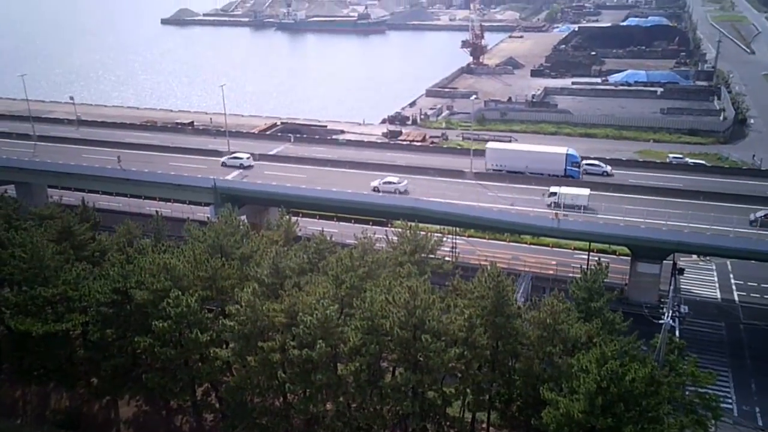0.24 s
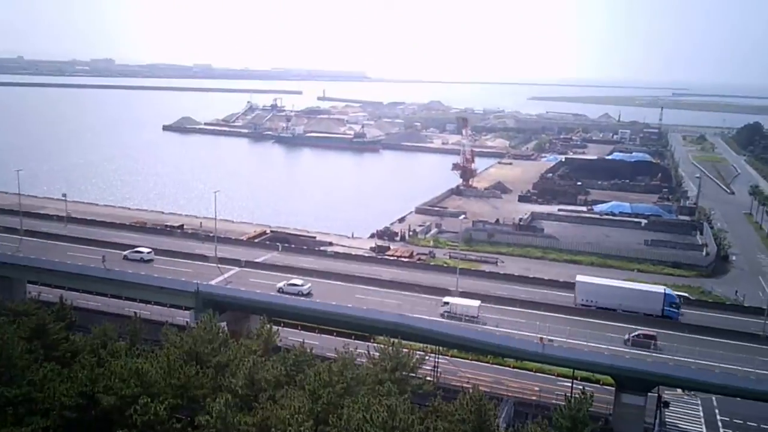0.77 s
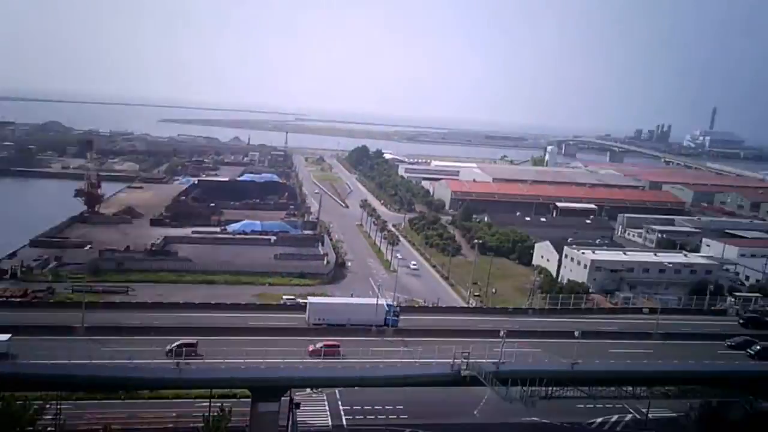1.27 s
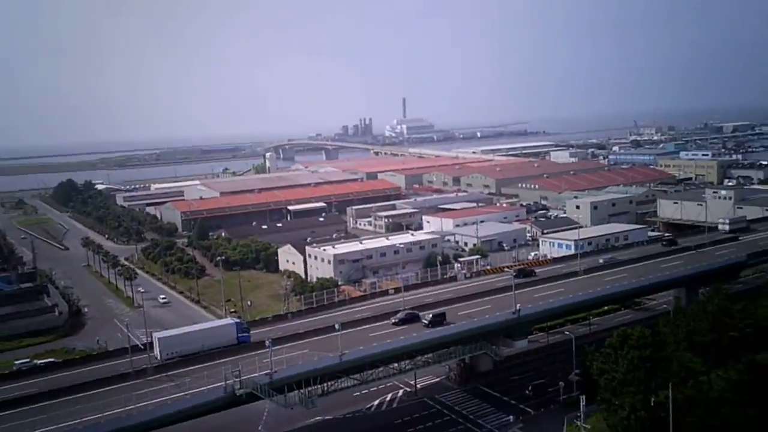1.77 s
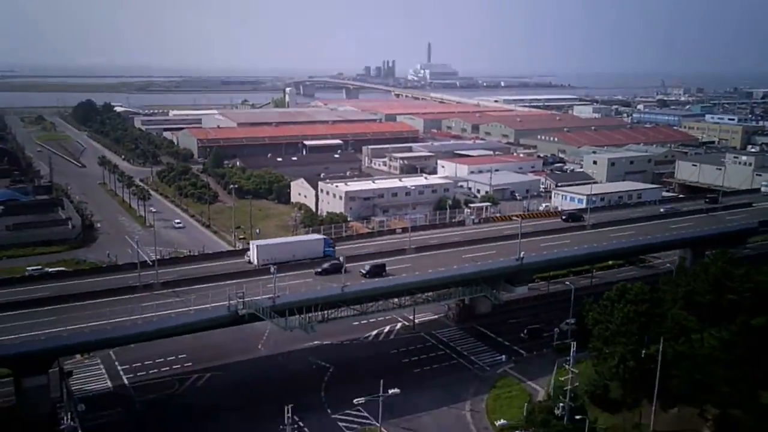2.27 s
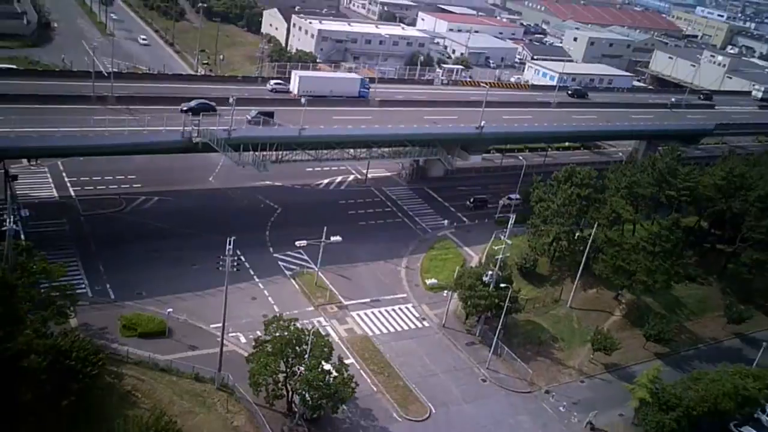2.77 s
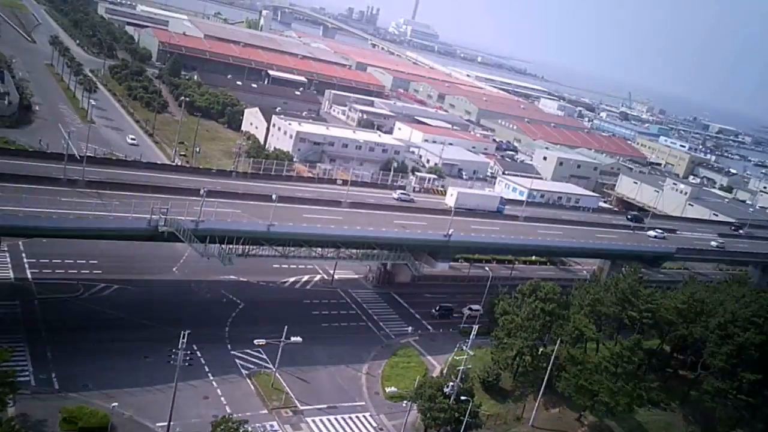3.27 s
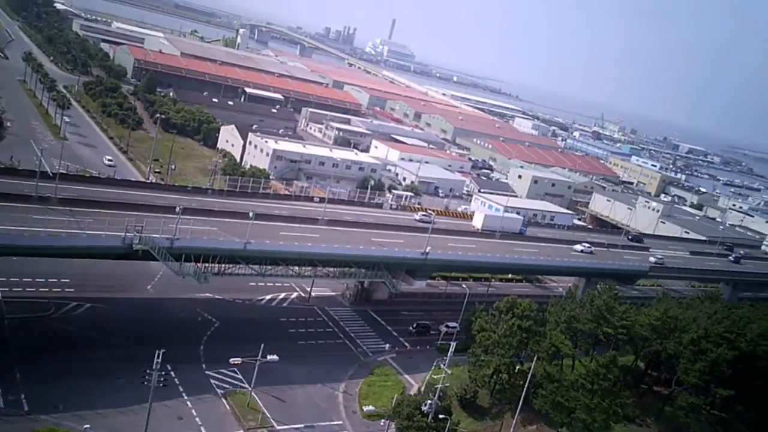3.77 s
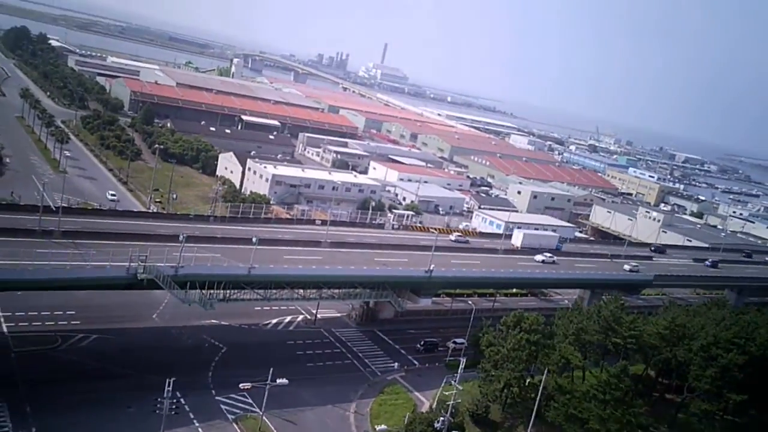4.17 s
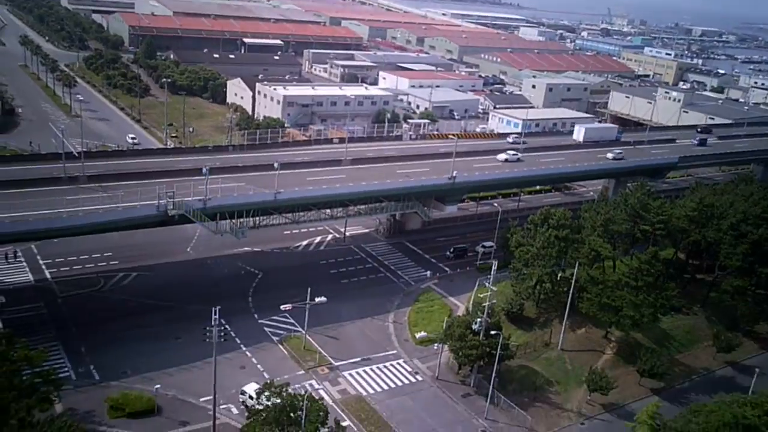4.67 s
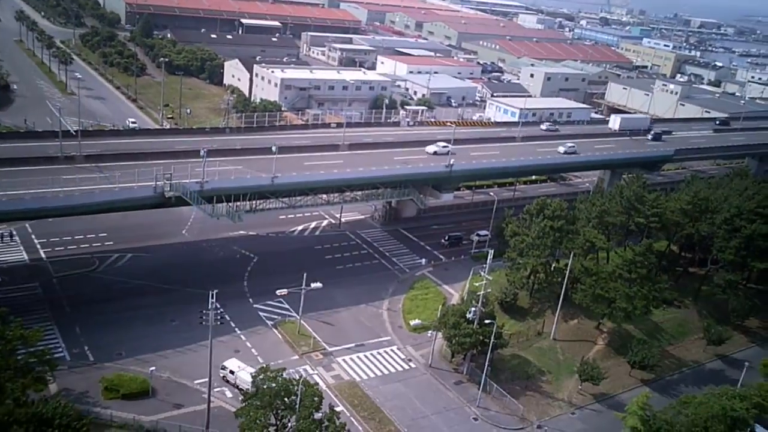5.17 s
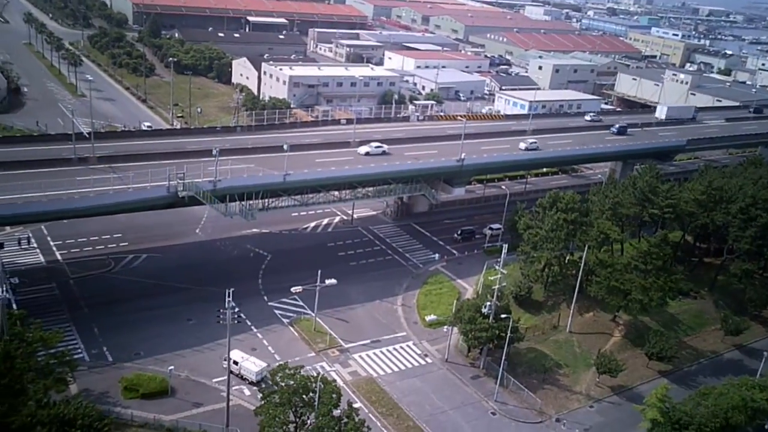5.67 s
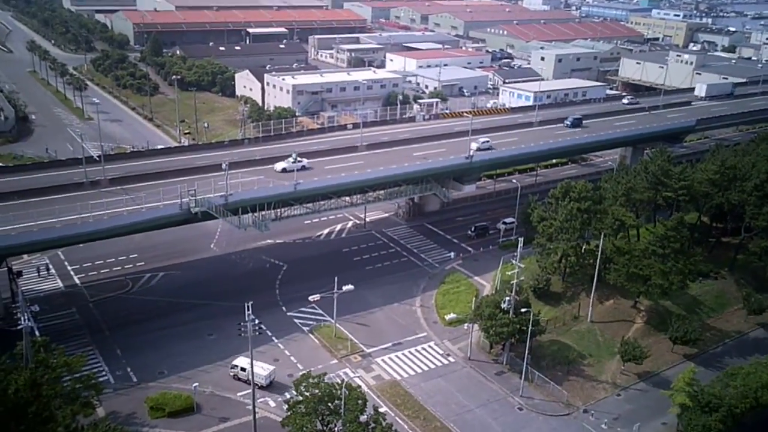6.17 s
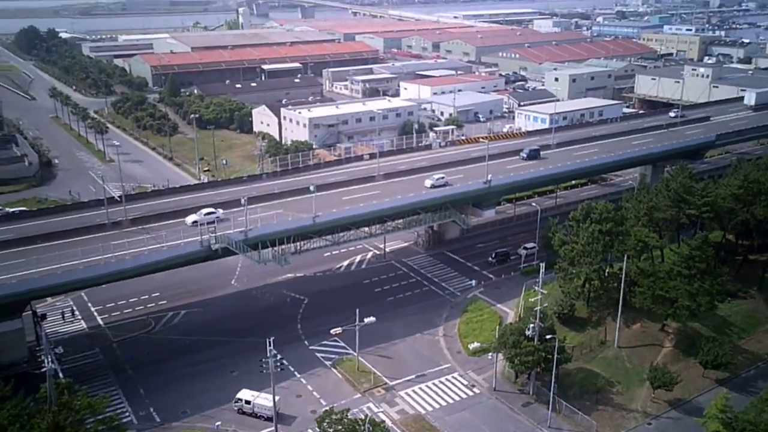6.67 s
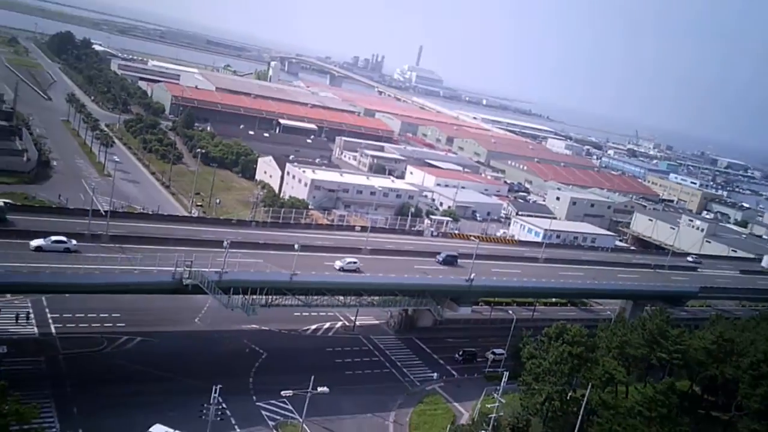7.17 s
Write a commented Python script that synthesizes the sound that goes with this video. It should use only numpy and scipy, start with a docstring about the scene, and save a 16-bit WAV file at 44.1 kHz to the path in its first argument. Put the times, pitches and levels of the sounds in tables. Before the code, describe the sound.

A small flying drone carries its own cheap microphone, very close to the motors. A low buzzing drone, gritty propeller wash and several unsteady shrill gear whines run continuously. After a quieter opening the sound bursts into overloaded, crackly roaring, then falls by stages to a loud, churning hum. Narrow dull bandwidth, no quiet gaps, short pitch yips throughout.

```python
"""Toy quadcopter in flight

A toy quadcopter flies, heard from the tiny camera that it carries. Four geared propellers hum through
the plastic frame (harmonics of the blade rate) and whine at their gear teeth; their speeds glide and yip.
Shaped noise makes the rush of air, the churning and the wind; a resonator makes the frame ring.
The whole sound suddenly leaps up to an overloaded roar, then falls back in steps."""
import sys
import numpy as np
from scipy import signal
from scipy.fft import rfft, irfft, next_fast_len
from scipy.io import wavfile
from scipy.ndimage import uniform_filter1d

SR = 44100
rng = np.random.default_rng(int(sys.argv[2]) if len(sys.argv) > 2 else 0)


def file_out(sig):
    """Save sig as 16-bit WAV at sys.argv[1]."""
    # one column per channel
    cols = np.atleast_2d(sig).T
    # limit, then scale
    lim = np.clip(cols, -1, 1)
    pcm = np.round(lim * 32767).astype(np.int16)
    wavfile.write(sys.argv[1], SR, pcm)


N = 327663
TIME = np.arange(N) / SR  # [s]
FUNDAMENTAL_LOSS = 0.67   # dB that the fundamental loses for each dB that the overtones gain


def from_db(db):
    """Decibels as an amplitude ratio: 20 dB for each factor of ten."""
    return 10 ** (np.asarray(db) / 20)


def rms_one(x):
    """Normalise the signal power, so that the rms is 1."""
    return x / np.sqrt(np.mean(x ** 2) + 1e-20)


def in_time(rows):
    """Linear interpolation of each column of a curve at every sample."""
    times, *columns = np.transpose(rows)
    return [np.interp(TIME, times, column) for column in columns]


def at_hz(points, hz):
    """Spectrum read by linear interpolation of decibels over log frequency."""
    f, level = np.transpose(points)
    return np.interp(np.log(np.maximum(hz, 1)), np.log(f), level)


def drift(corner_hz):
    """Slow random fluctuation of rms 1: white noise through a double-pole low-pass."""
    step = 40  # samples between the computed values
    r = np.exp(-2 * np.pi * corner_hz * step / SR)
    noise = rng.standard_normal(N // step + 2002)
    slow = signal.lfilter([1], [1, -2 * r, r * r], noise)[2000:]  # without the onset of the filter
    return np.interp(np.arange(N) / step, np.arange(len(slow)), rms_one(slow))


def coloured(x, spectrum):
    """Spectral shaping by a gain at each frequency, within the band of the small microphone; rms 1."""
    size = next_fast_len(N)
    hz = np.arange(size // 2 + 1) * SR / size
    gain = from_db(at_hz(spectrum, hz)) * (hz < SR / 8)
    return rms_one(irfft(rfft(x, size) * gain, size)[:N])


def wind_buffeting():
    """Wind on the microphone: random pressure with its power at low frequencies; rms 1."""
    # relative spectrum of the buffeting: (frequency [Hz], density [dB per Hz])
    buffet_spectrum = [(8, -5), (20, -14), (35, -1), (75, 3), (120, -3), (250, -3), (600, -20), (5500, -61)]
    return coloured(rng.standard_normal(N), buffet_spectrum)


def churning_air():
    """Low churning of disturbed air: random pressure as low-frequency noise; rms 1."""
    # relative spectrum of the churning: (frequency [Hz], density [dB per Hz])
    churn_spectrum = [(60, -28.5), (132, 1.5), (160, -7.5), (200, -9.5), (270, 2.5), (430, -0.5),
                      (520, -4.5), (640, -16.5), (2000, -42.5)]
    return coloured(rng.standard_normal(N), churn_spectrum)


def wash(beat, chop=0.053, flicker_db=1.0):
    """Propeller wash: turbulence noise amplitude-modulated by every passing blade; rms 1."""
    # relative spectrum of the wash through the camera shell: (frequency [Hz], density [dB per Hz])
    wash_spectrum = [(110, -7), (138, 8.5), (165, 1), (205, -3.5), (290, 5.5), (480, 4), (620, 1),
                     (1350, 1), (1650, -1), (2050, 3), (2300, -7.5), (2750, -9), (3450, 0), (3850, -8.5),
                     (4750, -4.5), (5500, -10.5)]
    flicker = from_db(flicker_db * drift(8.8))
    turbulence = rng.standard_normal(N) * (1 + chop * beat) * flicker
    return coloured(turbulence, wash_spectrum)


def frame_drone(mode_hz=164.4, width_hz=9.7):
    """Forced resonance: turbulence keeps the lowest mode of the plastic frame ringing; rms 1."""
    r = np.exp(-np.pi * width_hz / SR)
    poles = [1, -2 * r * np.cos(2 * np.pi * mode_hz / SR), r * r]
    return rms_one(signal.lfilter([1, 0, -1], poles, rng.standard_normal(N)))


def jabs(number):
    """Frequency yips [Hz of gear-mesh pitch]: the flight controller jabs one motor to level the craft."""
    # the jabs: (time of the top [s], rotor number [1 to 4], rise of the gear-mesh pitch [Hz])
    jab_rows = [(.83, 3, 260), (1.1, 3, 200), (1.16, 4, 230), (1.55, 3, 200), (1.69, 3, 300), (1.8, 3, 170),
                (2.07, 3, 240), (2.2, 3, 170), (2.73, 3, 580), (2.88, 3, 130), (3.47, 4, 70),
                (3.65, 3, 100), (3.8, 4, 300), (4.14, 2, 200), (4.2, 3, 380), (4.28, 3, 330),
                (4.33, 4, 850), (4.59, 4, 600), (4.6, 2, 130), (5.08, 2, 140), (5.96, 3, 190),
                (6.29, 4, 420), (6.45, 3, 140), (6.62, 4, 450), (6.69, 3, 240), (6.73, 4, 400),
                (6.86, 3, 130), (6.98, 2, 200)]
    rise_s, fall_s = .035, .045  # from the top to 1/e of it
    hz = np.zeros(N)
    for top, jabbed, rise_hz in jab_rows:
        if jabbed == number:
            width = np.where(TIME < top, rise_s, fall_s)
            hz += rise_hz * np.exp(-np.minimum(((TIME - top) / width) ** 2, 20))
    return hz


def rotor(course, jab_hz, bite_db, flutter, rattle, hum_flicker_db=0.5, whine_flicker_db=1.5,
          eccentric=0.19, blade_throb=0.4):
    """Geared propeller: periodic blade lift gives a harmonic hum, meshing teeth a modulated whine."""
    # harmonics of the blade rate, ahead of the frame: (multiple of the blade rate, level [dB])
    blade_orders = [(1, -41), (2, -36.5), (3, -45), (4, -48.5), (5, -50), (6, -54.5)]
    # response of the frame to the hum: (frequency [Hz], gain [dB])
    frame_response = [(60, -2.5), (120, -7), (145, -1.5), (155, 8), (166, 8.5), (178, 9.5), (190, -12.5),
                      (255, -11), (288, 2), (325, -2), (365, -5), (400, 4), (500, -0.5), (560, -4),
                      (1200, -11)]
    # strength of the gear whine against its own pitch: (frequency [Hz], level [dB])
    whine_response = [(2900, -45), (3450, -41), (3800, -44), (4150, -41), (4450, -46.5), (4800, -45.5),
                      (5300, -51.5), (6000, -38.5)]
    teeth_per_blade = 32
    trim_share, trim_corner_hz = .0035, 7  # rms share of the speed, rate of the corrections
    load_db_per_octave_per_s, load_limit_db = 1.8, 5.5

    set_hz = in_time(course)[0] + jab_hz
    # the flight controller keeps trimming the speed, which also flutters
    mesh_hz = set_hz * (1 + trim_share * drift(trim_corner_hz) + flutter * drift(40))
    blade_hz = mesh_hz / teeth_per_blade
    phase = 2 * np.pi * (np.cumsum(blade_hz) / SR + rng.random())

    hum = np.zeros(N)
    for multiple, level_db in blade_orders:
        multiple = round(multiple)
        drive_db = -FUNDAMENTAL_LOSS * bite_db if multiple == 1 else bite_db
        frame_db = at_hz(frame_response, multiple * blade_hz)
        gain = from_db(level_db + drive_db + frame_db + hum_flicker_db * drift(11))
        hum += gain * np.sin(multiple * phase + 2 * np.pi * rng.random())

    # a motor that speeds up presses its gear teeth together
    octaves_per_s = uniform_filter1d(np.gradient(np.log2(set_hz)) * SR, size=SR // 20)
    load_db = np.clip(load_db_per_octave_per_s * octaves_per_s, 0, load_limit_db)
    # the gear runs slightly off centre and each blade loads it: a throb once and twice a turn
    throb = 1 + eccentric * np.sin(phase / 2) + blade_throb * np.cos(phase)
    # play between the teeth smears the whine
    teeth = np.sin(teeth_per_blade * phase + rattle * drift(160))
    whine_db = at_hz(whine_response, mesh_hz) + load_db + whine_flicker_db * drift(16)
    whine = from_db(whine_db) * throb * teeth
    return hum, whine, np.cos(phase)


def scene():
    """Superposition at the microphone: pressures of rotors, wash, frame, churning and wind add."""
    # gear-mesh pitch of each rotor, without jabs, trim and flutter: (time [s], pitch [Hz])
    courses = [(0, 5380), (.7, 5370), (1.0, 5715), (1.2, 5143), (1.42, 5130), (1.55, 5620), (1.75, 5575),
               (1.95, 5284), (2.3, 5320), (2.5, 5720), (2.95, 6000), (3.38, 5900), (3.46, 5240),
               (4.2, 5330), (4.55, 5450), (5.5, 5360), (6.5, 5400), (7.4, 5250)], [(0, 5300), (.7, 5330), (.98, 4750), (1.25, 5080), (1.44, 5130),
                                (1.72, 4200), (1.92, 4450), (2.0, 4850), (2.17, 5220), (2.62, 5310),
                                (2.96, 4970), (3.02, 5150), (3.38, 5090), (3.5, 4880), (4.0, 4650),
                                (4.4, 4600), (4.75, 4760), (4.92, 4570), (5.5, 4530), (5.8, 4710),
                                (6.25, 4550), (6.9, 4630), (7.14, 5150), (7.4, 5240)], [(0, 4440), (.25, 4420), (.4, 4120), (.75, 4040),
                                                 (.9, 4270), (1.02, 4080), (1.43, 4660), (1.5, 4080),
                                                 (1.62, 3950), (1.85, 4280), (2.0, 4170), (2.2, 4280),
                                                 (2.45, 4050), (2.66, 3900), (2.8, 4150), (2.97, 4200),
                                                 (3.03, 4800), (3.3, 4780), (3.4, 4360), (3.78, 4280),
                                                 (4.1, 4040), (4.7, 3980), (4.8, 4300), (5.15, 4340),
                                                 (5.52, 4010), (5.7, 4250), (5.92, 4240), (6.25, 4030),
                                                 (6.97, 4000), (7.05, 4480), (7.4, 4550)], [(0, 4400), (.25, 4390), (.4, 4120),
                                                                  (.74, 4150), (.98, 3020), (1.25, 3380),
                                                                  (1.44, 3520), (1.51, 4850), (1.63, 4600),
                                                                  (1.9, 3350), (2.02, 3500), (2.26, 3500),
                                                                  (2.44, 4050), (2.66, 3780), (2.75, 4650),
                                                                  (2.95, 4800), (3.03, 3450), (3.22, 3700),
                                                                  (3.88, 3720), (4.0, 3470), (4.8, 3500),
                                                                  (4.92, 3980), (5.9, 3970), (6.2, 3500),
                                                                  (7.0, 3530), (7.15, 3750), (7.43, 3700)]
    # each rotor: (blade hum [dB], gear whine [dB], rms speed flutter [share], rms gear rattle [radians])
    rotor_build = [(-1, -8.5, .002, .3), (1, -0.5, .003, .4), (-3, 1, 0.00353, .5), (-1, 0, 0.00651, .75)]
    # gear whine of all rotors: (time [s], level [dB])
    whine_level = [(0, 5), (.7, 0.5), (.9, 2.5), (1.4, 3), (1.7, -1), (2.15, 3.5), (2.5, -6), (2.85, -3.5),
                   (3.1, -8), (3.5, 2), (4.6, -1.5), (6.5, -0.5), (7.4, -5.5)]
    # hard-biting blades move the hum from the fundamental to the overtones: (time [s], overtones [dB])
    bite = [(0, 0), (.5, 1.5), (1.35, 0), (1.65, -1.5), (2.05, 0), (2.35, 5), (2.9, 3.5), (3.25, 4.5),
            (3.7, -2), (4.5, 0), (6.6, -2.5), (7.2, 3)]
    # strength of the churning: (time [s], level [dB])
    churn_level = [(0, -38.5), (1.2, -35.5), (1.6, -42), (2.1, -36.5), (2.9, -42), (3.5, -35), (4.6, -31),
                   (6.0, -31.5), (7.4, -41)]
    # wind on the microphone, in gusts and lulls: (time [s], level [dB])
    gusts = [(0, -36.5), (.85, -38), (1.08, -62.5), (1.55, -31.5), (2.05, -48.5), (2.35, -37.5), (2.9, -37),
             (3.2, -48), (4.0, -40), (6.25, -40.5), (6.75, -47), (7.12, -36.5), (7.4, -41.5)]
    # level in average churning [dB], share of the swing of the churning that is followed
    wash_db, wash_follows = -32, 0.2
    drone_db, drone_follows = -46.5, .5  # the drone also weakens with the fundamental

    gears_db, = in_time(whine_level)
    bite_db, = in_time(bite)
    churn_db, = in_time(churn_level)
    gust_db, = in_time(gusts)
    swing_db = churn_db - churn_db.mean()

    rotors, beat = np.zeros(N), np.zeros(N)
    for k, (hum_db, whine_db, flutter, rattle) in enumerate(rotor_build):
        hum, whine, blades = rotor(courses[k], jabs(k + 1), bite_db, flutter, rattle)
        rotors += from_db(hum_db) * hum + from_db(whine_db + gears_db) * whine
        beat += blades

    wind = from_db(gust_db) * wind_buffeting()
    churn = from_db(churn_db) * churning_air()
    air = from_db(wash_db + wash_follows * swing_db) * wash(beat)
    ringing_db = drone_db + drone_follows * swing_db - FUNDAMENTAL_LOSS * bite_db
    drone = from_db(ringing_db) * frame_drone()
    return (rotors + air + churn + wind + drone)[None]


def record(dry, input_top=0.67, output_top=0.68, edge_hz=5150):
    """Clipping and aliasing: the camera clips and samples at a quarter rate, mirroring the highest whine."""
    # sudden changes of the overall level: (time from which it holds [s], level [dB])
    level_steps = [(0, 3), (2.9794, 22.5), (3.381, 20.5), (3.95, 16), (4.889, 12.5), (5.79, 7.5)]
    cutoff_hz = 16500
    starts, step_db = np.transpose(level_steps)
    gain = from_db(step_db[np.searchsorted(starts[1:], TIME)])
    clipped = np.clip(dry * gain, -input_top, input_top)
    sampled = clipped * 4 * (np.arange(N) % 4 == 0)  # every fourth sample, at its former mean level
    smooth = signal.firwin(81, edge_hz, window=("kaiser", 7), fs=SR)
    rebuilt = signal.fftconvolve(sampled, smooth[None], "same")
    out = np.clip(rebuilt, -output_top, output_top)  # overshoots of the smoothing clip again
    return signal.sosfilt(signal.cheby2(16, 70, cutoff_hz, fs=SR, output="sos"), out)


dry = scene()
out = record(dry)
file_out(out)
```